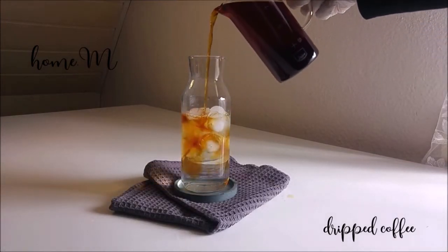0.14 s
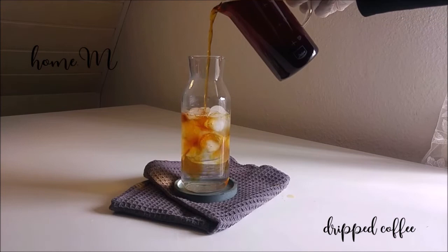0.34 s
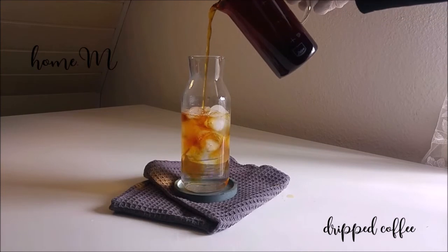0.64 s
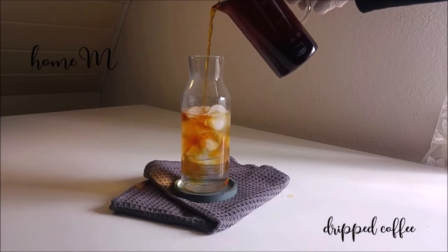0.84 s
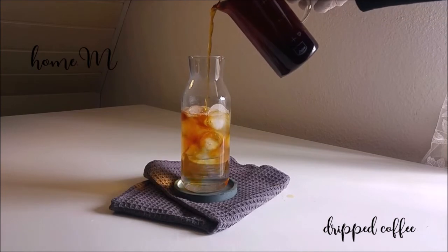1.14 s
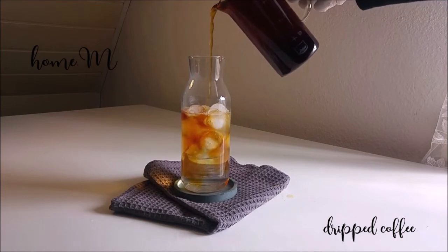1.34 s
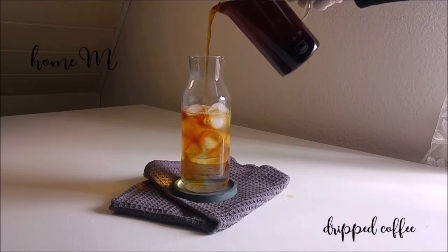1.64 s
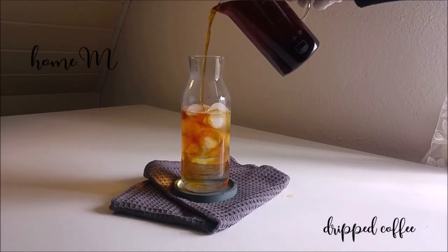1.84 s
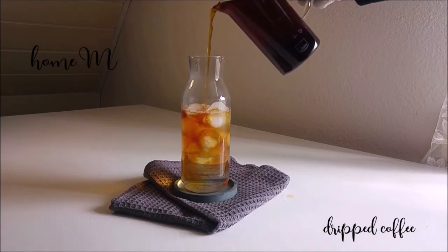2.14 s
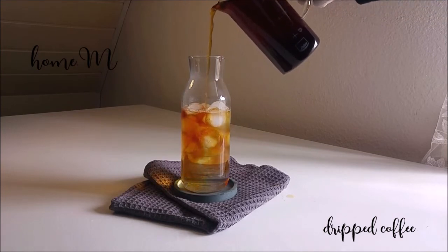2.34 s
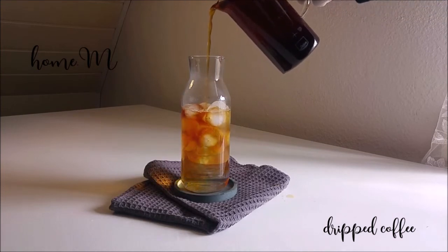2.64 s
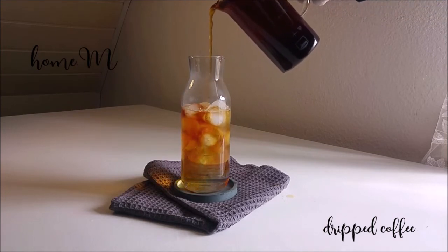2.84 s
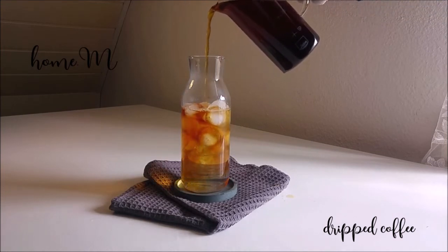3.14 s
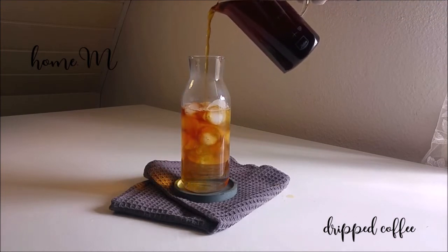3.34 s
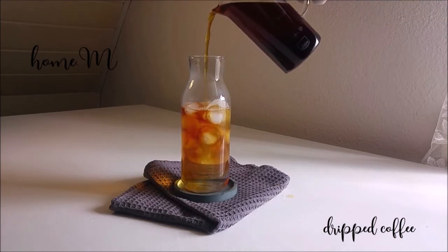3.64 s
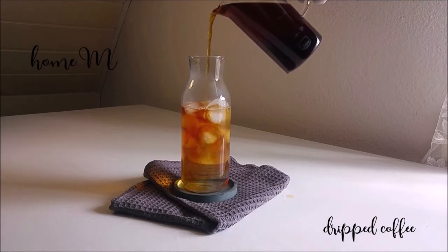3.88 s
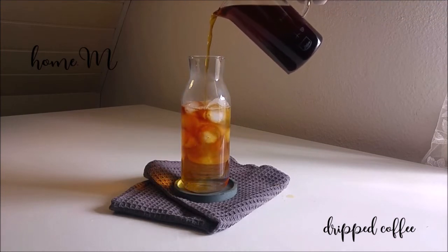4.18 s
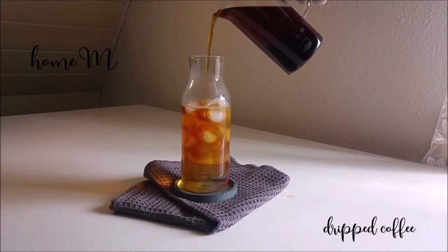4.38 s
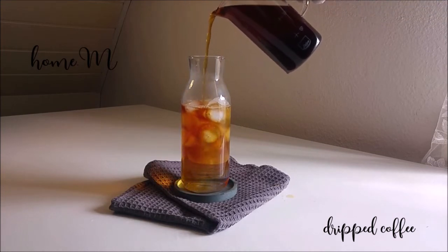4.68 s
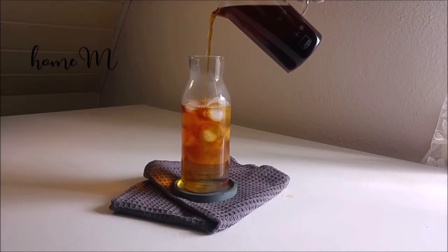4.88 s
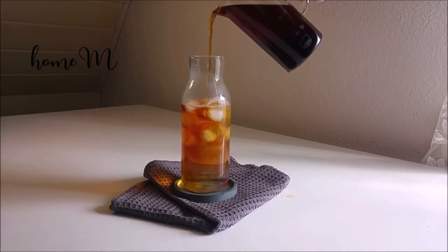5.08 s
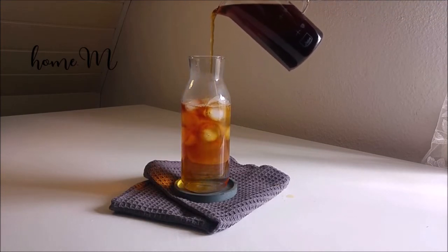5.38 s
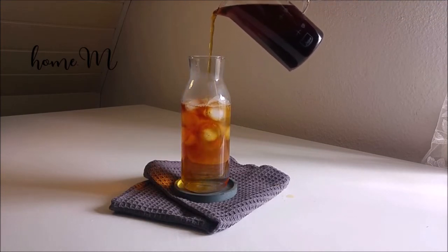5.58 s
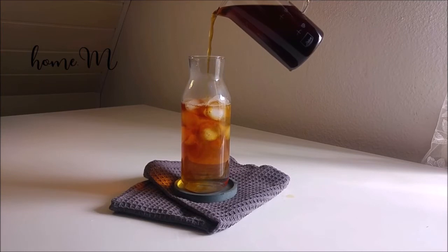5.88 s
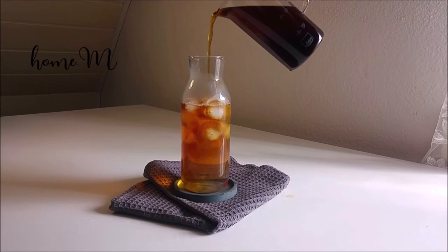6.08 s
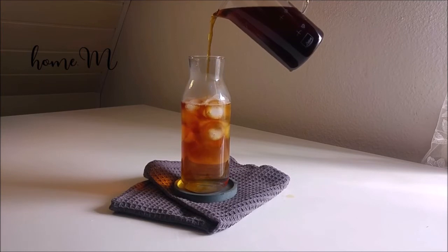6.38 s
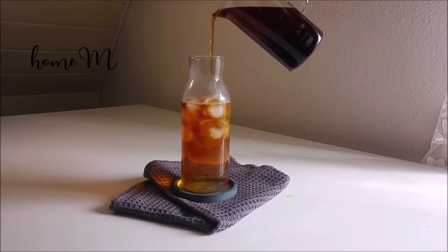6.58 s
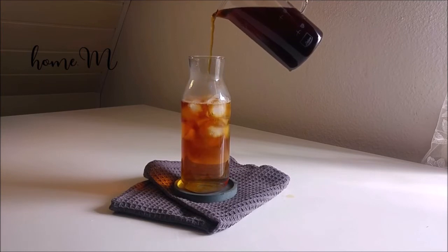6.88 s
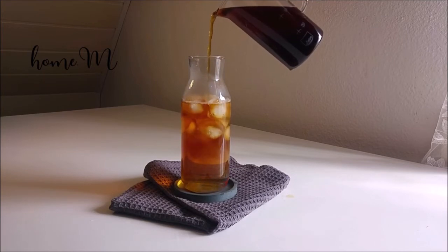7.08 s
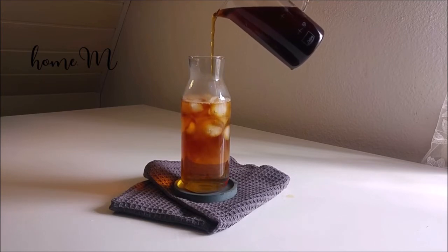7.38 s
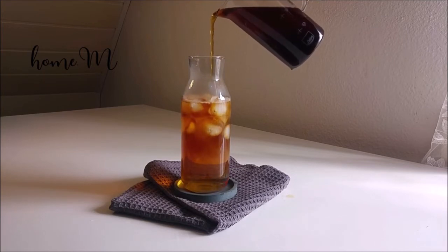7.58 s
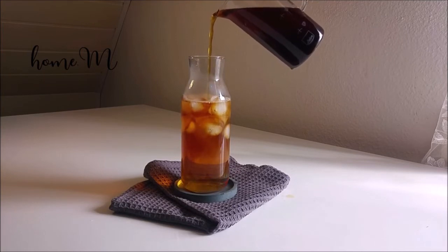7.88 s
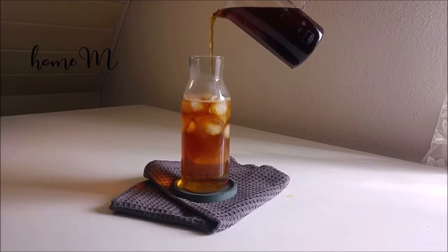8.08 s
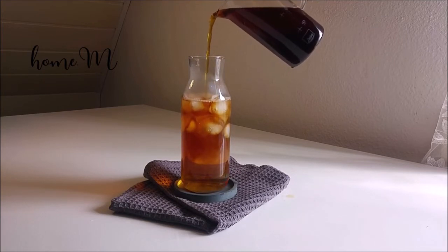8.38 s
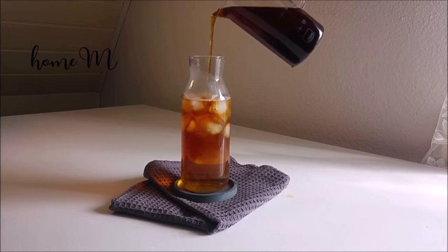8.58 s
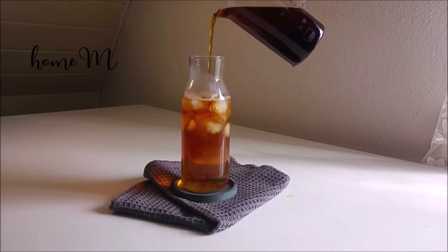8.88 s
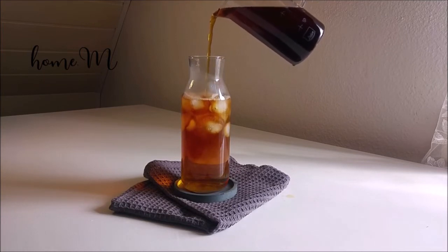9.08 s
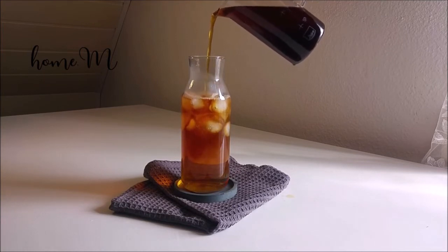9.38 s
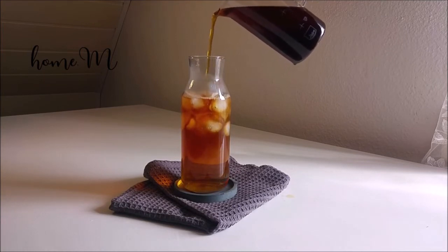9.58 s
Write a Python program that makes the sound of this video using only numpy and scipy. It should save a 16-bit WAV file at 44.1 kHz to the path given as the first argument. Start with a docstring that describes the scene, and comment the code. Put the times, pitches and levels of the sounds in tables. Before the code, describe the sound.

A thinning stream of coffee plops and splashes over ice in a glass bottle, the hollow pitch slowly climbing in a small kitchen.

```python
"""In a small, hard kitchen, coffee pours unevenly into a glass bottle of ice and water.
Two microphones, set apart, hear it over a faint hum and hiss and the low drone of the shaken table.
Fine spray fizzes and snaps on the ice. The stream drags air under, and its bubbles and plops
ring the air above the liquid, whose note rises as the bottle fills."""
import sys
import numpy as np
from scipy import signal
from scipy.fft import rfft, irfft, next_fast_len
from scipy.io import wavfile
from scipy.ndimage import uniform_filter1d

SR = 44100
rng = np.random.default_rng(int(sys.argv[2]) if len(sys.argv) > 2 else 0)


def to_wav(s):
    """Save 16-bit WAV."""
    ch = np.atleast_2d(s).T  # columns
    pcm = np.round(np.clip(ch, -1, 1) * 32767)  # PCM
    wavfile.write(sys.argv[1], SR, pcm.astype(np.int16))


N = 429093


def amp(db):
    """Turns decibels into a number to multiply by."""
    return 10 ** (np.asarray(db) / 20)


def unit_rms(x):
    """Scales a sound so that its average strength (rms) is 1."""
    return x / np.sqrt(np.mean(x ** 2) + 1e-20)


def over_time(rows, column=1):
    """Joins a table's points in time with straight lines, one value a sample."""
    rows = np.array(rows)
    return np.interp(np.arange(N) / SR, rows[:, 0], rows[:, column])


def over_pitch(rows, hz, column=1):
    """Looks up a table at the frequencies hz."""
    rows = np.array(rows)
    return np.interp(np.log(hz + 1), np.log(rows[:, 0] + 1), rows[:, column])


def resonate(x, hz, width_hz):
    """Makes x ring at a gliding pitch; a narrower width rings longer."""
    turn = np.exp(2j * np.pi * np.cumsum(hz) / SR)
    decay = np.exp(-np.pi * width_hz / SR)
    return 2 * (turn * signal.lfilter([1 - decay], [1, -decay], x / turn + 1e-18)).real


def clicks(per_s, spread_db):
    """Scattered clicks, up or down at random; most are small, a few large."""
    when, size = rng.random((2, N))
    size_db = spread_db * np.minimum(-np.log(size + 1e-9), 4)
    chance = per_s / SR / 2
    return amp(size_db) * ((when < chance) * 1. - (when > 1 - chance))


def bubble(hz, cycles, rise):
    """A fading tone with a soft start; its pitch climbs as the bubble nears the surface."""
    turns = np.arange(int(4 * cycles * SR / hz)) * hz / SR
    shape = (1 - np.exp(-turns)) * np.exp(-turns / cycles)
    return shape * np.sin(2 * np.pi * turns * (1 + rise * turns / cycles))


def bubbles(kicks, pitches_hz, cycles, rise):
    """Every click becomes a bubble of a random size; gives one track for each size."""
    size = rng.integers(0, len(pitches_hz), N)
    return np.array([unit_rms(signal.oaconvolve(kicks * (size == k), bubble(hz, cycles, rise))[:N])
                     for k, hz in enumerate(pitches_hz)])


# how alike the room sounds on the left and right: f/Hz, likeness (0 to 1)
LIKENESS = [(60, 0.28), (700, 0.7), (1300, 0)]
def two_sides(left, other, hz):
    """Blends two unrelated spectra into left and right; low notes come out partly alike."""
    same = np.clip(over_pitch(LIKENESS, hz), 0, 1)[:, None]
    return np.array([left, same * left + np.sqrt(1 - same ** 2) * other])


# tone of the background: f/Hz, relative level/dB
HUSH_TONE = [(30, 6.5), (50, -4.5), (340, -2.5), (500, -32.5), (600, -0.5), (1500, -11.5), (3400, -14.5),
             (4500, -22), (6200, -5.5), (7500, -3.5), (8100, -44), (15900, -10)]
# loudness of the background: t/s, level/dB
HUSH_LEVEL = [(0, -62), (5, -67), (9.73, -70)]
def hush():
    """Room hum and microphone hiss: noise with faint louder and softer patches."""
    frames, hz = N // 256 + 5, np.fft.rfftfreq(1024, 1 / SR)
    a, b, c, d, patches = rng.standard_normal((frames, 513, 5)).T
    patches = uniform_filter1d(patches, size=10, axis=0)  # smooth across pitch
    patches = unit_rms(uniform_filter1d(patches, size=14, axis=1))  # and across time
    spectra = two_sides(a + 1j * b, c + 1j * d, hz)
    spectra *= amp(over_pitch(HUSH_TONE, hz)[:, None] + 1.8 * patches)
    noise = signal.istft(spectra, nperseg=1024, noverlap=768)[1][:, :N]
    return amp(over_time(HUSH_LEVEL)) * unit_rms(noise)


# low notes of the table top: f/Hz, width/Hz, relative level/dB
TABLE_NOTES = [(100, 11, -0.5), (156, 15, -1)]
# soft knocks that shake it: t/s, relative level/dB
TABLE_THUDS = [(0.772, -73), (5.391, -71.5)]
def table_top(flow_db):
    """The churning and a few soft thuds make the table hum under the bottle."""
    shake = rng.standard_normal(N) * amp(-58 + 0.44 * flow_db)
    for start, db in TABLE_THUDS:
        shake[round(start * SR):][:200] += amp(db) * np.hanning(200)
    hum = np.zeros(N)
    for hz, width, db in TABLE_NOTES:
        ring = signal.lfilter(*signal.iirpeak(hz, hz / width, SR), shake)
        hum += amp(db) * np.sqrt(SR / width / 2 / np.pi) * ring
    return hum


# how long the echoes last: f/Hz, time to fade by 60 dB/s
ECHO_FADE = [(600, 0.083), (3000, 0.16), (15000, 0.062)]
def kitchen(x, echo_db):
    """The direct sound, a little later on one side, then echoes that fade at each pitch's own speed."""
    echoes = np.zeros((2, 2, SR // 3))  # microphone, spot where the stream lands, sample
    slots = np.arange(130, SR // 3 - 24, 24)
    arrivals = slots + rng.integers(0, 24, (2, 2, len(slots)))
    np.put_along_axis(echoes, arrivals, rng.choice([-1., 1.], arrivals.shape), 2)
    hz, t, (left, other) = signal.stft(echoes, SR, nperseg=256)
    fade = amp(-60 * t / over_pitch(ECHO_FADE, hz)[:, None])
    room = signal.istft(two_sides(left, other, hz) * fade, SR, nperseg=256)[1]
    room *= amp(echo_db) / np.linalg.norm(room, axis=2)[..., None]
    room[[0, 1, 0, 1], [0, 0, 1, 1], [3, 0, 1, 2]] += 1  # direct sound, 0 to 3 samples late
    room /= np.linalg.norm(room[0, 0])
    spot = np.cos(2 * np.pi * 2.3 * np.arange(N) / SR) ** 2  # the stream wanders between two spots
    heard = signal.oaconvolve((x * [spot, 1 - spot])[None], room, axes=2)
    return heard.sum(1)[:, :N]


# tone at each microphone: f/Hz, left level/dB, right level/dB
SIDE_TONE = [(229.7, -4.5, -2), (497, -2, 2), (495, -14, -13), (570, 8.5, 11.5), (1300, 5.5, 4.5),
             (6090, -4.5, 0), (8530, 8.5, 8)]
# low notes of the room (standing waves): f/Hz
ROOM_NOTES = [313, 374, 460]
def room_colour(x, note_width_hz=26):
    """Bounces off the table and walls colour each side, and the room boosts its own low notes."""
    size = next_fast_len(N, True)
    hz = np.fft.rfftfreq(size, 1 / SR)
    sides = amp([over_pitch(SIDE_TONE, hz), over_pitch(SIDE_TONE, hz, column=2)])
    notes = sum(1 / (1 + 2j * (hz - f) / note_width_hz) for f in ROOM_NOTES)
    return irfft(rfft(x, size) * sides * (1 + amp(2) * notes), size)[:, :N]


def swells(rows, floor_db, rise_db_per_s, fall_db_per_s):
    """A level in dB: each row (start, hold, level) rises, holds and falls on top of a floor."""
    t, step = np.arange(N) / SR, 64
    start, hold, db = np.transpose(rows)[..., None]
    age = t[::step] - start
    swell_db = db + rise_db_per_s * np.minimum(age, 0) - fall_db_per_s * np.maximum(age - hold, 0)
    power = amp(2 * swell_db).sum(0) + amp(2 * floor_db[::step])
    return np.interp(t, t[::step], 10 * np.log10(power))


# bursts of spray off the ice: t/s, level/dB
SPRAY_BURSTS = [(0.197, -51.5), (0.471, -52.5), (0.76, -44), (0.941, -52.5), (1.251, -51), (1.347, -48.5),
                (1.71, -54), (2.25, -57), (2.44, -49.5), (2.604, -49.5), (2.885, -50), (3.023, -53),
                (3.399, -57), (3.514, -59), (3.96, -55.5), (4.58, -60.5), (5.485, -54), (5.598, -65),
                (5.921, -66), (6.419, -66), (7.159, -51), (7.418, -55), (7.514, -53.5), (7.758, -60),
                (8.024, -59.5), (8.324, -62.5), (9.064, -67), (9.197, -71)]
# fine mist between bursts: t/s, relative level/dB
SPRAY_MIST = [(0, -44), (9.73, -48.5)]
def spray_level(flow_db):
    """Strength of the spray in dB: short bursts over a mist that follows the stream."""
    bursts = [(peak, 0, db) for peak, db in SPRAY_BURSTS]
    mist_db = over_time(SPRAY_MIST) + 0.44 * flow_db
    return swells(bursts, mist_db, rise_db_per_s=548, fall_db_per_s=220.5)


# tone of the fizz: f/Hz, relative level/dB
FIZZ_TONE = [(2500, -39), (4000, -16), (5200, -3.5), (6900, 8.5), (7900, -1.5), (8700, -1), (11000, -7),
             (15500, -12)]
def fizz(spray_db):
    """Bursting droplets crackle and give tiny pings."""
    hz = np.fft.rfftfreq(256, 1 / SR)
    crack = np.fft.fftshift(irfft(amp(over_pitch(FIZZ_TONE, hz)))) * np.hanning(256)
    bursts = clicks(per_s=2500, spread_db=7.0)
    pings = bubbles(bursts, np.geomspace(4000, 15500, num=18), cycles=9, rise=0.01).sum(0)
    crackle = signal.oaconvolve(unit_rms(bursts) + amp(4.5) * unit_rms(pings), crack, "same")
    return amp(spray_db) * unit_rms(crackle)


# single sharp hits on the ice: t/s, relative level/dB, f/Hz
ICE_SNAPS = [(0.463, -32.5, 2795), (0.731, -24.5, 6630), (1.1123, -30.5, 8500), (1.326, -35, 5370),
             (1.342, -28, 2530), (1.344, -21.5, 6560), (1.3978, -25.5, 7080), (2.618, -28, 3510),
             (3.2117, -40, 2900), (3.284, -36.5, 3340), (3.644, -41.5, 11000), (4.036, -35.5, 2560),
             (4.087, -30.5, 1560), (4.498, -41, 3320), (4.534, -41, 2960), (4.571, -38, 7500),
             (5.123, -34.5, 2260), (5.5922, -33, 6760), (5.747, -47, 2230), (5.913, -36, 8060),
             (5.921, -40, 3400), (7.153, -33.5, 3410), (7.4283, -39, 3470), (7.7511, -33, 3010),
             (8.019, -37, 8800), (8.909, -51, 3450)]
def ice_snaps(ring_cycles=55, clatter_s=0.03):
    """Spray snaps on the ice: a short ring inside a rough clatter."""
    out, t = np.zeros(N), np.arange(2000) / SR
    rough = unit_rms(uniform_filter1d(rng.standard_normal((len(ICE_SNAPS), len(t))), size=40))
    for (start, db, hz), grit in zip(ICE_SNAPS, rough):
        shape = amp(-60 * t * hz / ring_cycles) + amp(-2) * grit * amp(-60 * t / clatter_s)
        part = out[round(start * SR):][:len(t)]
        part += (amp(db - 7.5) * shape * np.sin(2 * np.pi * hz * t))[:len(part)]
    return out


# the stream between gushes, thinning as the pour slows: t/s, level/dB
STREAM_TRICKLE = [(0, -43.5), (1.5, -48), (3.5, -49.5), (4.2, -65.5), (7.93, -80.5), (8.55, -72),
                  (9.73, -73.5)]
# gushes that drag air under: t/s, hold/s, level/dB
STREAM_GUSHES = [(0.397, 0.028, -31), (0.631, 0.056, -37), (1.066, 0.61, -40), (1.364, 0.12, -35.5),
                 (1.633, 0.088, -43), (2.212, 0.1, -41.5), (2.433, 0.069, -36.5), (2.734, 0.13, -41.5),
                 (3.095, 0.0095, -38), (3.233, 0.054, -42.5), (3.66, 0.038, -41), (3.75, 0.012, -30),
                 (3.965, 0.038, -36), (4.035, 0.051, -33), (4.312, 0.013, -53), (4.64, 0.11, -41.5),
                 (5.15, 0.14, -51), (5.375, 0.13, -52), (5.578, 0.046, -39.5), (5.728, 0.12, -54),
                 (5.887, 0.058, -49.5), (6.004, 0.038, -52.5), (6.183, 0.0065, -45.5),
                 (6.387, 0.089, -56.5), (6.671, 0.081, -51.5), (6.84, 0.089, -48), (7.046, 0.031, -46),
                 (7.145, 0.094, -42), (7.321, 0.13, -53.5), (7.51, 0.036, -45), (7.59, 0.0099, -40),
                 (7.737, 0.076, -52), (8.002, 0.11, -56.5), (8.182, 0.024, -53.5), (8.316, 0.0034, -54),
                 (8.443, 0.095, -59.5), (8.832, 0.04, -50.5), (9.048, 0.011, -49.5), (9.191, 0.006, -50),
                 (9.526, 0.0083, -55)]
def flow_level():
    """Strength of the stream in dB: sudden gushes over a trickle."""
    return swells(STREAM_GUSHES, over_time(STREAM_TRICKLE), rise_db_per_s=791, fall_db_per_s=317.5)


# big bubbles, fainter as the coffee's fall shortens: t/s, relative level/dB, typical f/Hz
BIG_BUBBLES = [(0, -52.5, 405), (3.4, -64, 427.4), (4.3, -78.5, 435), (5.5, -77, 410), (5.85, -69.5, 708.5),
               (7.7, -66, 795), (8.0, -79, 540), (9.73, -84.5, 392)]
def deep_bubbles(churn, flow_db):
    """Big pockets of trapped air ring low and swell with each gush."""
    pitches_hz = np.geomspace(280, 900, num=10)
    typical_hz = over_time(BIG_BUBBLES, column=2)
    nearness = np.exp(-(np.log(pitches_hz[:, None] / typical_hz) / 0.51) ** 2)
    deep = unit_rms((nearness * bubbles(churn, pitches_hz, cycles=2.94, rise=0.015)).sum(0))
    surge_db = flow_db - uniform_filter1d(flow_db, size=SR)  # compared with the one-second average
    return amp(over_time(BIG_BUBBLES) + 0.78 * surge_db) * deep


AIR_WIDTH_HZ = 52
def bottle_air(kicks, note_hz):
    """The bottle's lowest note: the mouth softens each kick, and the air inside rings on."""
    softened = resonate(kicks, note_hz, width_hz=150)
    return resonate(softened, note_hz, AIR_WIDTH_HZ)


# single plops that stand out: t/s, relative level/dB
LOUD_PLOPS = [(0.135, -20), (0.181, -20), (0.317, -21.5), (0.355, -25.5), (0.393, -29), (0.441, -19.5),
              (0.632, -21.5), (0.658, -28.5), (0.713, -25.5), (0.748, -17.5), (0.97, -19.5), (1.058, -21),
              (1.113, -19.5), (1.173, -10.5), (1.247, -11.5), (1.368, -13.5), (1.415, -11.5),
              (1.438, -18.5), (1.891, -23), (2.073, -22), (2.216, -14), (2.429, -23), (2.554, -18),
              (2.576, -9), (2.943, -14.5), (3.013, -21), (3.653, -34), (3.728, -22.5), (3.958, -22),
              (4.314, -25.5), (5.143, -29.5), (5.187, -20.5), (5.482, -22.5), (6.177, -24.5),
              (6.403, -28.5), (6.671, -20), (6.889, -28.5), (6.907, -31), (7.042, -32.5), (7.159, -23.5),
              (7.228, -31.5), (7.59, -25), (8.321, -45), (9.042, -42)]
def plops(note_hz):
    """Each plop kicks the air in the bottle and traps one big bubble."""
    kicks, glugs = np.zeros((2, N))
    bubble_hz = over_time(BIG_BUBBLES, column=2)
    for start, db in LOUD_PLOPS:
        at = round(start * SR)
        kicks[at] = amp(db - 8.0) * SR / (2 * np.pi * AIR_WIDTH_HZ)
        glug = amp(db - 22.5) * bubble(bubble_hz[at], cycles=3.2, rise=0.024)
        glugs[at:][:len(glug)] += glug
    return bottle_air(kicks, note_hz) + glugs


# notes of the shrinking air space: t/s, lowest f/Hz, neck f/Hz, relative neck level/dB
BOTTLE_NOTES = [(0, 725, 2916, 0.5), (1.8, 752.2, 2890, -1), (5, 883.3, 3057, -3.5),
                (7.2, 995.6, 3430, -2.5), (9.73, 1149, 3510, -9)]
def splash(churn, flow_db, spray_db):
    """Middle-sized bubbles and the ring of the bottle's neck follow both the stream and the spray."""
    kicks = churn + clicks(per_s=2000, spread_db=9.0)
    drops = unit_rms(bubbles(kicks, np.geomspace(1200, 4000, num=14), cycles=2.2, rise=0.069).sum(0))
    neck_hz, neck_db = over_time(BOTTLE_NOTES, column=2), over_time(BOTTLE_NOTES, column=3)
    neck = unit_rms(resonate(clicks(per_s=300, spread_db=7.0), neck_hz, width_hz=160))
    return amp(0.27 * flow_db + 0.53 * spray_db - 19.5) * unit_rms(drops + amp(neck_db) * neck)


def gurgle(churn, flow_db):
    """Churning and plops ring the bottle's rising note, with deep bubbles below it."""
    slosh = np.interp(np.arange(N) / SR, np.arange(0, 10, .04), rng.standard_normal(250))
    note_hz = over_time(BOTTLE_NOTES) * (1 + 0.025 * slosh)  # the heaving surface shifts the note
    churning = amp(flow_db - 5.0) * unit_rms(bottle_air(churn, note_hz))
    return churning + plops(note_hz) + deep_bubbles(churn, flow_db)


def scene():
    """The pour echoes in the kitchen, over the hush and the humming table."""
    churn = clicks(per_s=320, spread_db=3.8)  # air dragged under by the stream
    flow_db = flow_level()
    spray_db = spray_level(flow_db)
    pour = kitchen(gurgle(churn, flow_db), echo_db=3.6)
    pour += kitchen(splash(churn, flow_db, spray_db), echo_db=1.0)
    pour += kitchen(fizz(spray_db) + ice_snaps(), echo_db=5)  # deep in the glass, so mostly echoes
    return room_colour(pour) + hush() + table_top(flow_db)


def record(dry, top_hz=15770):
    """Cuts away the very highest treble."""
    lowpass = signal.firwin(511, top_hz, window=("kaiser", 9), fs=SR)
    return signal.oaconvolve(dry, lowpass[None], "same")


dry = scene()
out = record(dry)
to_wav(out)
```